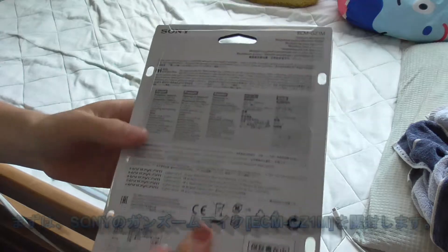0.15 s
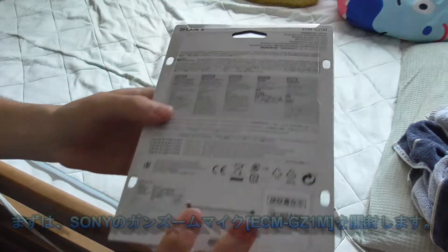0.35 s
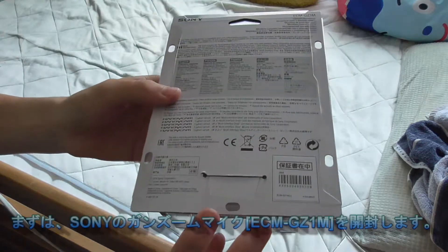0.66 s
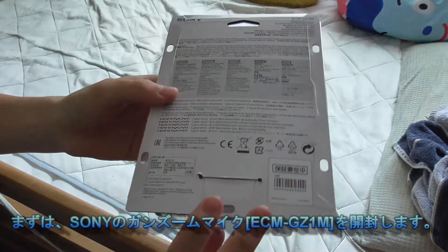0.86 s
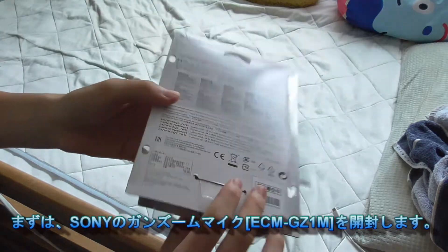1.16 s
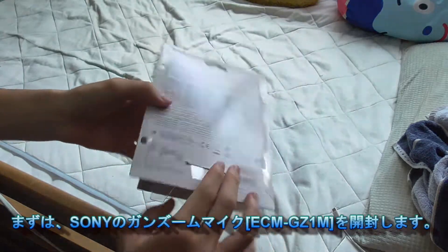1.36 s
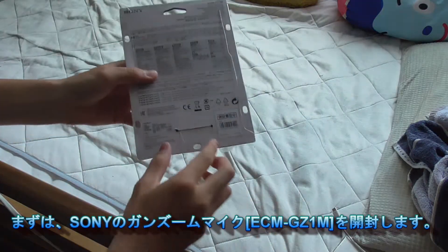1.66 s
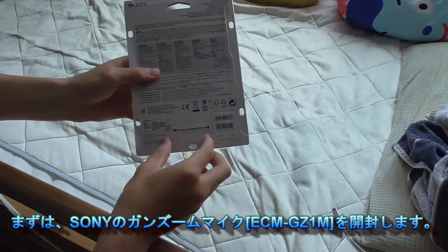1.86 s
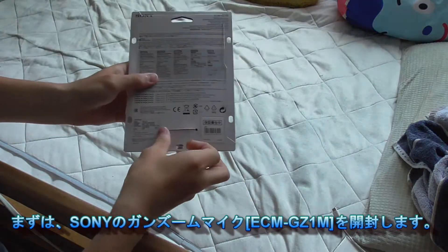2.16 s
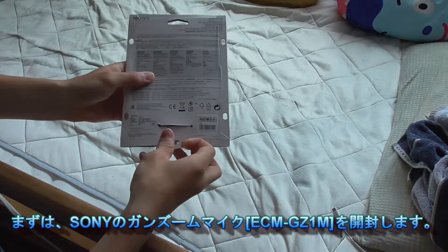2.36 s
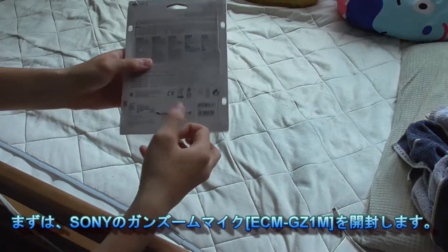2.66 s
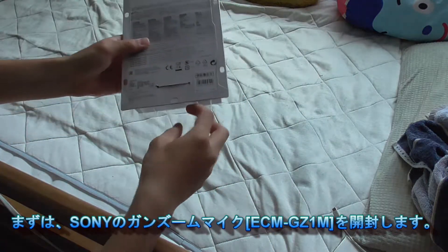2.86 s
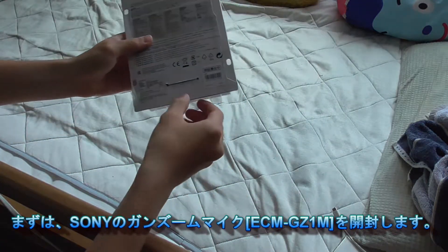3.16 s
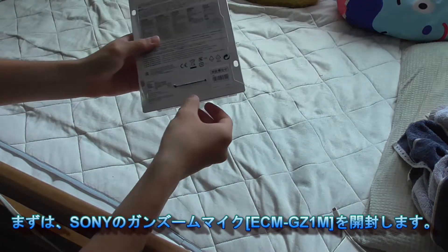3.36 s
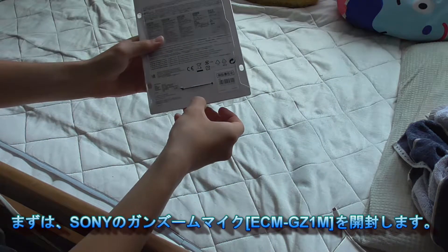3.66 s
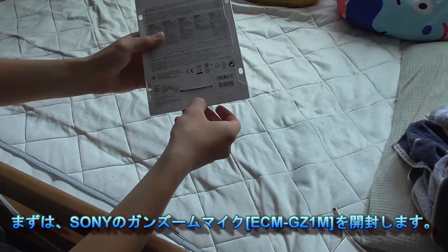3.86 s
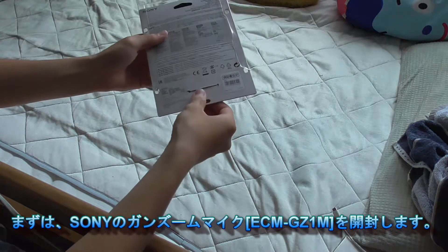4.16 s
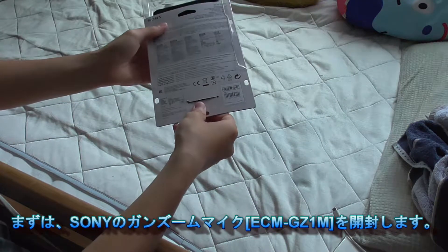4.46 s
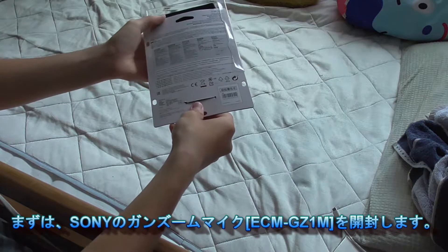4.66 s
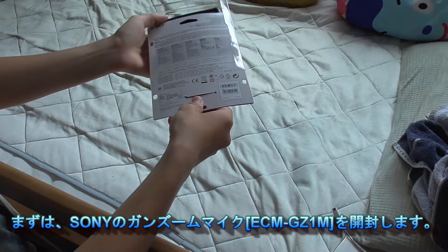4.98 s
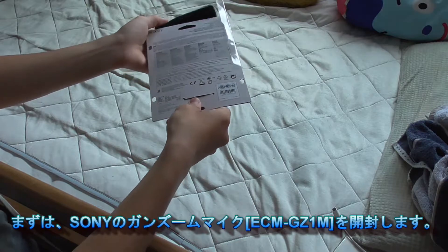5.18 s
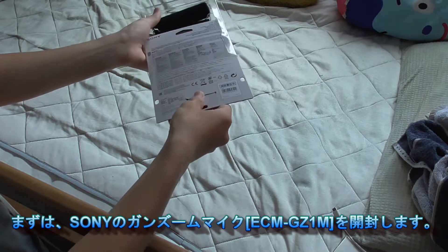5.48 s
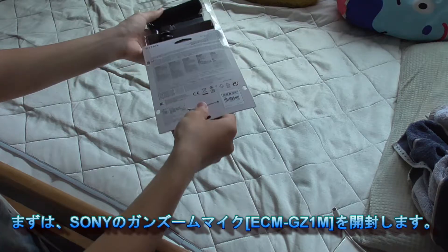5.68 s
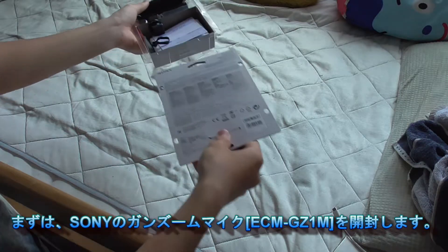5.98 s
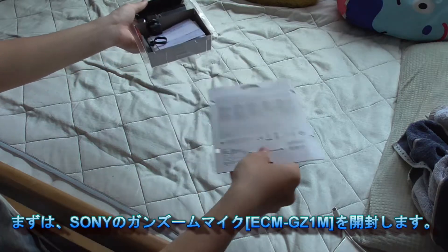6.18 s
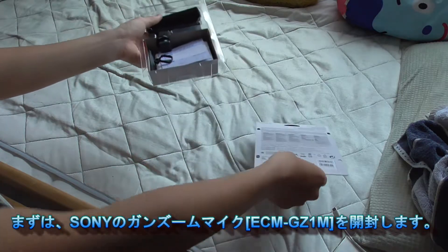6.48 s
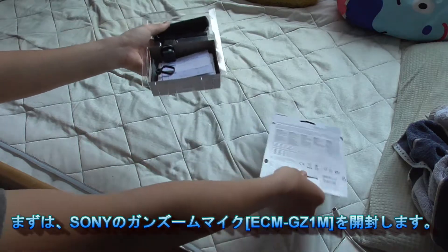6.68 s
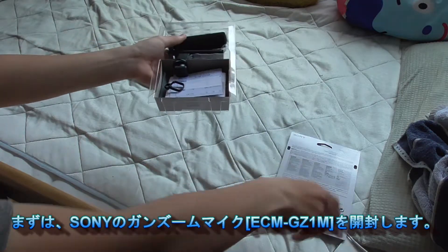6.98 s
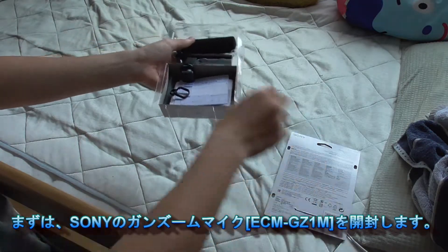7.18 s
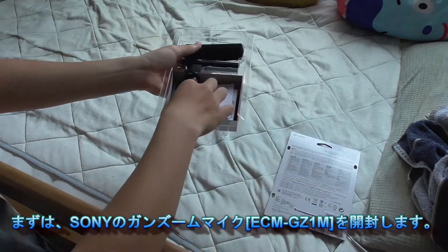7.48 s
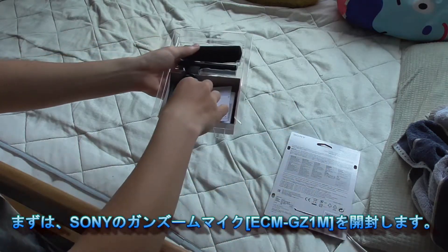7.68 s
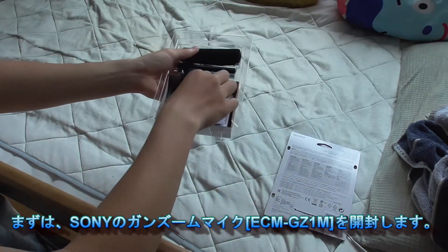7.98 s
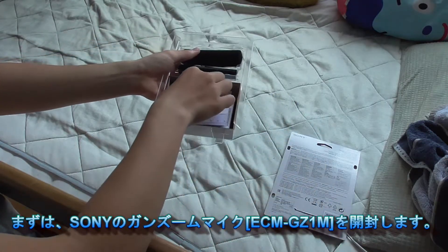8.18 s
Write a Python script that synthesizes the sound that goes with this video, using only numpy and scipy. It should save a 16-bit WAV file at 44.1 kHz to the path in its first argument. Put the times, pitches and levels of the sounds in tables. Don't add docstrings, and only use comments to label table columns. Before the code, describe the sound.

Close indoor handling of a plastic blister pack: sharp clicks and cracks, hollow little thumps, then a paper card scraped out in short strokes over faint fan rumble.

```python
import sys
import numpy as np
from scipy import signal
from scipy.fft import rfft, irfft, next_fast_len
from scipy.io import wavfile
from scipy.ndimage import uniform_filter1d

SR = 44100
rng = np.random.default_rng(int(sys.argv[2]) if len(sys.argv) > 2 else 0)


def put_to_file(sound):
    columns = np.atleast_2d(sound).T
    safe = np.clip(columns, -1, 1)
    whole_steps = np.round(safe * 32767)
    wavfile.write(sys.argv[1], SR, whole_steps.astype(np.int16))


def to_linear_factor(level_db):
    exponent = np.asarray(level_db, float) / 20
    return 10 ** exponent


N = 367353

# freq_hz, level_db
RUMBLE = [(15, -63.5), (25, -49.5), (139, -9.5), (173, -6.5), (224, -2.5), (313, -0.5), (345, -2.5),
          (397, -14), (421, -7), (523, -3.5), (650, -10.5), (823, -10.5), (1300, -18.5), (1740, -28),
          (2390, -27.5), (2800, -52.5), (3640, -61.5), (6160, -120)]
# freq_hz, level_db
HISS = [(1650, -31.5), (2800, -7), (2990, -13), (3260, -7.5), (3540, -9), (4340, -11), (4600, -9.5),
        (6070, -17), (7330, -12), (9200, -5), (9740, 1), (10300, -6.5), (12300, -7.5), (12750, -3.5),
        (13200, -8), (15800, -14.5), (15950, -71)]
# freq_hz, likeness (1 = same)
ALIKE = [(60, -1.3), (130, 0.82), (290, 0.85), (640, 0.56), (1410, 0.3), (3100, 0.24), (6820, 0.17),
         (15000, -0.031)]
# pitch_hz, width_hz, level_db
FAN_TONES = [
    (229.7, 4.4, -62.5),
    (341.2, 1.3, -67),
]

# freq_hz, level_db
SCRAPE = [(250, -26), (420, 3), (520, -10.5), (587, 6), (738, -4), (859, 2), (927, -2.5), (1220, -1),
          (1580, -8.5), (2730, -19.5), (3300, -9.5), (3900, -4.5), (4250, -4.5), (4800, -6.5),
          (5770, -12.5), (7470, -10.5), (11800, -16), (15750, -28), (15950, -80.5)]
# start_s, end_s, start_level_db, end_level_db, sizzle_db (re scrape)
FINGERS = [(0, 0.4, -60.5, -70, 3.5), (1.14, 1.53, -78, -66, 2.5), (1.551, 3.798, -62.5, -76.5, -0.5),
           (3.963, 4.325, -61, -90, -3), (4.802, 5.03, -69, -73, 0.5), (5.034, 5.315, -78, -59.5, 0.5),
           (5.443, 5.645, -68, -66.5, 2.5), (6.988, 7.36, -69.5, -87, 3), (7.53, 8.117, -68, -77.5, -8.5)]
# start_s, length_s, peak_db, card_body_db, sizzle_db (re scrape)
SHOVES = [(0, 0.11, -63.5, -8, 2), (0.154, 0.016, -61.5, 1, 7.5), (1.785, 0.047, -61, -26, -8),
          (2.024, 0.082, -58, 2, 0), (2.764, 0.0315, -47, -8, -7), (2.893, 0.042, -55.5, 0, -7),
          (4.93, 0.046, -62, 2, -22), (5.094, 0.12, -63.5, 3, -12), (5.522, 0.044, -60.5, -1, 1.5),
          (7.015, 0.031, -58, 7.5, 4)]
# start_s, length_s, peak_db, card_body_db, sizzle_db (re scrape)
RUBS = [(0.199, 0.022, -62, -8, 8.5), (0.246, 0.067, -65.5, -10, 5), (0.382, 0.022, -50, -15, -2),
        (1.402, 0.052, -53, -12, -22), (1.504, 0.12, -59, 0, 8), (1.626, 0.024, -51, -9, -6),
        (1.94, 0.044, -63.5, 11, -17), (2.232, 0.077, -57.5, 1, 1.5), (3.149, 0.027, -56.5, 4, -2.5),
        (4.212, 0.073, -69.5, -2, 0), (7.068, 0.024, -47, -3, -9), (6.0825, 0.013, -40, -27, 1),
        (6.394, 0.1, -72, -3, 2.5), (6.926, 0.016, -60, 12, -1), (6.935, 0.049, -49.5, 10.5, 1.5),
        (7.27, 0.038, -52.5, 9, -2.5), (7.534, 0.084, -59.5, 8.5, -4), (7.653, 0.098, -63.5, 13, -3),
        (7.6, 0.065, -67, 10, -12), (2.95, 0.13, -65.5, 9.5, -20), (3.105, 0.015, -68, -8, -20),
        (7.84, 0.036, -69.5, 8, -3), (3.36, 0.06, -67, -7, -20), (2.715, 0.06, -60, -8, -5)]
# (time_s, scrape_db)
PULLS = [
    (-45, -8.5, [(3.788, -84), (3.798, -62), (3.826, -60.5), (3.84, -48), (3.875, -48.5), (3.915, -53), (3.94, -71)]),
    (-45.5, -6, [(3.972, -83), (3.984, -51.5), (4.04, -43), (4.115, -44.5), (4.13, -58.5), (4.18, -87)]),
    (-47, -5, [(4.31, -73), (4.33, -49.5), (4.37, -46), (4.49, -57), (4.56, -66)]),
    (-54.5, 2, [(4.54, -69.5), (4.68, -62), (4.79, -62.5), (4.82, -76)]),
    (-49.5, -2, [(5.26, -81), (5.31, -47), (5.37, -44), (5.43, -48), (5.485, -73)]),
    (-51, -3, [(5.63, -73), (5.645, -52), (5.69, -43), (5.73, -50.5), (5.82, -52.5), (5.94, -59.5)]),
    (-49, -6, [(5.93, -55), (5.97, -44.5), (5.987, -31.5), (6.005, -54), (6.045, -71)]),
]
# start_s, length_s, level_db
FIZZ = [(3.819, 0.087, -50.5), (3.99, 0.047, -55), (5.313, 0.15, -73), (5.64, 0.61, -66)]

# ratio (to main mode), level_db
TRAY_MODES = [(.62, -23), (0.801, -16.5), (1.0, 6.5), (1.28, -1), (1.6, -5.5), (2.1, -7)]
# start_s, peak_db, pitch_hz, t60_s, bass_db (re peak)
THUMPS = [(0.147, -45, 530, 0.037, -4), (0.162, -37, 620, 0.016, -3), (0.286, -44, 714, 0.023, -10),
          (1.5013, -29.5, 760, 0.0098, -3), (1.5018, -23.5, 261, 0.043, -34),
          (1.5091, -38, 1000, 0.011, -30), (2.08, -25.5, 630, 0.014, -26), (2.233, -33, 638, 0.04, -28),
          (2.329, -42, 553, 0.02, -14), (2.444, -31, 560, 0.011, -31), (2.527, -40, 533, 0.027, -17),
          (2.6125, -40, 640, 0.03, -28), (2.6185, -23, 610, 0.045, -40), (2.781, -44, 700, 0.039, -8),
          (2.811, -37, 556, 0.025, -6), (2.885, -36, 540, 0.072, -28), (3.296, -38, 467, 0.023, -23.5),
          (3.326, -40.5, 454, 0.023, -32), (3.409, -34, 570, 0.014, -30), (3.519, -34, 575, 0.025, -28),
          (5.3, -33.5, 636, 0.031, -5), (5.972, -28.5, 730, 0.025, -32), (7.0635, -34, 1070, 0.019, -35),
          (7.064, -35, 295, 0.036, -25)]
# start_s, peak_db, pitch_hz, blow_ms, bass_db (re peak)
BUMPS = [(0.39, -36, 632, 3.5, -3), (1.155, -30, 675, 5.2, -3.5), (1.624, -35.5, 565, 15, -25),
         (1.691, -37, 630, 4.7, -21), (1.714, -35, 565, 4.2, -14), (2.004, -41.5, 420, 17, -1.5),
         (2.198, -35, 404, 5.6, -6), (2.423, -27, 570, 4.5, -44), (4.34, -42, 1553, 130, -34),
         (5.33, -41, 746, 140, -35), (5.99, -37, 705, 8, -8), (6.937, -32.5, 620, 11, -1.5),
         (6.954, -38.5, 540, 15, -15), (7.005, -55, 1020, 26, -21), (7.273, -38, 1053, 6.3, -3),
         (7.276, -35, 590, 11.3, -6)]

# start_s, peak_db, ring_hz, sizzle_db (re peak)
SNAPS = [(0.287, -45, 4760, -7), (0.342, -45, 5490, -9), (1.153, -46, 4900, 2), (1.163, -45.5, 5120, 10.5),
         (1.201, -39, 4780, -27), (1.416, -40, 5840, -6), (1.4233, -36.5, 5730, -6),
         (1.9086, -56, 4500, -20), (2.006, -46.5, 5600, -10), (2.0418, -46, 6020, 2),
         (2.3305, -30, 3700, -8), (2.447, -35, 4310, -15.5), (2.528, -51, 4020, -20.5),
         (2.803, -45, 3450, 0), (2.8792, -32, 4300, -11), (3.2944, -33, 4700, -12),
         (3.3286, -45, 4200, -21), (4.263, -44, 4570, -14), (6.089, -35, 3550, -13),
         (6.9363, -42.5, 3160, 11), (7.7507, -52, 4370, -12), (7.994, -50, 3780, -14)]
# start_s, peak_db, ring_hz, sizzle_db (re peak), card_db (re peak)
CRACKS = [
    (1.5017, -26, 4170, -10, -12),
    (2.0826, -20, 4100, -6, -9),
    (2.6171, -15, 3480, -3, -16),
    (3.5197, -34, 4200, -3.5, -16),
    (7.0643, -27, 4060, -3.5, -14.5),
]
# start_s, peak_db, ring_hz, sizzle_db (re peak), length_ms
SCUFFS = [(1.151, -43.5, 4970, -3, 9.3), (1.618, -38.5, 4970, -12, 4.7), (2.0773, -25, 4000, -10, 3.8),
          (2.1923, -42, 4700, -6, 11), (2.234, -33.5, 4350, -24, 3.2), (2.4211, -27.5, 3940, -13, 8.4),
          (2.612, -39, 4500, -26, 9.8), (2.7795, -33, 3300, -12, 3.2), (2.857, -47, 4240, -11, 11),
          (3.265, -53, 4170, -9, 9.8), (3.4065, -33.5, 4200, -5, 7.8), (3.978, -54, 4400, -6, 4.4),
          (4.326, -37, 4150, -21, 4.6), (7.272, -42, 3550, 4, 3.3)]

# pitch_hz, width_hz, level_db
RIM = [(3746, 340, -8), (4800, 700, 1.5), (7150, 280, -8.5), (7700, 700, -4), (8900, 500, -4),
       (9720, 900, -2), (10700, 330, -11), (11600, 300, -19.5), (13270, 900, -17.5), (14650, 580, -9.5),
       (15420, 1000, -15)]
FLAP = [(2900, 180, -26), (4050, 800, 3), (5130, 160, -4), (6900, 520, -3.5), (8260, 690, -11),
        (9300, 400, -10), (10500, 400, -3.5), (11700, 860, -5), (12800, 210, -12), (14930, 520, -27)]
CORNER = [(2390, 380, -3), (3220, 460, 0), (4150, 440, 1), (5130, 690, -5.5), (6470, 540, -6),
          (8300, 460, -7), (9440, 380, -8), (10520, 590, -12.5), (12370, 250, -22), (13200, 400, -22)]
BACK = [(610, 120, -3), (1000, 170, -1.5), (1140, 310, 0), (1378, 91, -3), (2090, 240, -10),
        (3160, 330, -11.5), (4050, 550, -7.5), (4970, 330, -9), (6400, 790, -15), (9230, 470, -16),
        (13200, 440, -37)]
SHEET = [(1120, 420, -0.5), (3450, 240, -4), (3920, 380, 0.5), (6310, 360, -5), (7570, 880, -3.5),
         (8610, 350, -5), (8900, 270, -14), (11600, 380, -17)]
RAIL = [(713, 150, 2.5), (997, 185, 2.5), (2040, 250, -12), (2920, 200, -17), (4300, 290, -15),
        (4940, 240, -24), (7500, 300, -19)]
LIP = [(3617, 610, -2), (4760, 600, -5.5), (450, 130, -2), (760, 150, -2), (895, 200, -1), (1150, 86, -7.5),
       (1440, 160, -8), (1910, 200, -10.5)]
HOLLOW = [(550, 100, -13), (925, 130, 6), (4000, 220, -6), (5200, 320, -16)]
TAB = [(312, 120, -2), (1250, 170, 1), (2100, 250, -6)]
POUCH = [(568, 130, -1), (1030, 190, -16.5)]
STAPLE = [(3380, 410, -4), (4400, 550, -3), (6460, 860, 1), (7710, 700, -4), (8800, 820, -4.5)]
CREASE = [(1480, 830, -6), (2680, 900, 2), (4300, 1600, -2), (6600, 1600, -1), (8500, 2000, -11)]
# start_s, peak_db
TICKS = [(1.9245, -59), (3.8304, -39), (3.9785, -36), (4.2163, -53), (4.3574, -34), (4.4544, -34),
         (5.563, -43), (7.0358, -39.5), (7.538, -48), (7.5457, -42), (7.6054, -50), (7.66, -50),
         (7.667, -48), (7.6804, -39), (7.693, -44), (7.716, -44), (1.1525, -42), (1.1575, -40),
         (4.379, -38), (4.3875, -38), (4.408, -46), (7.7014, -47), (7.8724, -55), (7.9428, -49),
         (8.0094, -53), (8.0694, -52)]
# (start_s, peak_db)
JOLTS = [(BACK, [(1.5017, -12.5), (1.5092, -36), (2.0795, -36), (2.0825, -31)]), (CORNER, [(2.0817, -17),
         (2.0829, -13), (2.0878, -31), (2.0902, -28)]), (HOLLOW, [(2.4255, -33), (2.4293, -28.5),
         (2.4478, -39)]), (RIM, [(2.617, -10)]), (LIP, [(2.6179, -11)]), (FLAP, [(3.5195, -21),
         (3.5255, -36), (3.5275, -38), (3.5298, -36)]), (RAIL, [(5.9692, -22.5), (5.9725, -30),
         (5.9765, -29), (5.9925, -35), (5.9995, -32)]), (TAB, [(5.985, -26.5), (5.9885, -34)]),
         (POUCH, [(3.4078, -31), (3.4114, -30.5), (2.8052, -31.5), (3.8, -40), (5.31, -34)]),
         (SHEET, [(7.0641, -20), (7.0655, -37)]), (CREASE, TICKS), (STAPLE, [(2.7808, -32), (2.7826, -24),
         (6.0832, -34), (6.0886, -29.5), (6.093, -35)])]

# freq_hz, side_db (re mid)
PORTS = [(60, -13), (110, -6.5), (200, -26.5), (380, -7.5), (700, -28.5), (1290, -11), (2380, -23.5),
         (4400, -22.5), (8120, 0), (15000, -4.5)]
# freq_hz, left_minus_right_db
LEAN = [(150, 1), (400, 0.5), (1300, 3.5), (2400, 0.5), (4400, 1), (8100, 1), (15000, -5.5)]
# freq_hz, t60_s
ROOM = [(250, 0.19), (700, 0.13), (1800, 0.097), (4500, 0.18), (10000, 0.14), (15000, 0.07)]
# freq_hz, level_db
REFLECT = [(200, -4.5), (700, 3), (2000, 2), (4000, -6), (7000, -6.5), (12000, -5)]


def evened(x):
    return x / np.sqrt(np.mean(x ** 2) + 1e-20)


def peaked(x, db):
    return to_linear_factor(db) * x / (abs(x).max() + 1e-12)


def add(mix, start_s, sound):
    part = mix[round(start_s * SR):][:len(sound)]
    part += sound[:len(part)]


def read(points, hz):
    f, value = np.transpose(points)
    return np.interp(np.log(hz + 1), np.log(f + 1), value)


def coloured(x, points, lo_hz=0., hi_hz=SR):
    length = x.shape[-1]
    size = next_fast_len(length + 512)
    hz = np.fft.rfftfreq(size, 1 / SR) + 1
    edges = 1 / np.sqrt((1 + (lo_hz / hz) ** 12) * (1 + (hz / hi_hz) ** 12))
    spectrum = rfft(x, size) * to_linear_factor(read(points, hz)) * edges
    return irfft(spectrum, size)[..., :length]


def band(x, lo_hz, hi_hz, order):
    sos = signal.butter(order, [lo_hz, hi_hz], "band", fs=SR, output="sos")
    return signal.sosfilt(sos, x)


def ring(x, hz, t60):
    r = to_linear_factor(-60 / (max(t60, .001) * SR))
    w = 2 * np.pi * hz / SR
    return signal.lfilter([np.sin(w)], [1, -2 * r * np.cos(w), r * r], x)


def air(points, db, patchy_db, swell_db):
    frames = N // 256 + 5
    hz = np.fft.rfftfreq(1024, 1 / SR)
    a, b, c, d, patches = rng.standard_normal((frames, 513, 5)).T
    patches = uniform_filter1d(patches, size=6, axis=0)
    patches = evened(uniform_filter1d(patches, size=14, axis=1))
    swell = evened(uniform_filter1d(rng.standard_normal(frames), size=40))
    alike = np.clip(read(ALIKE, hz), -1, 1)[:, None]
    left = a + 1j * b
    right = alike * left + np.sqrt(1 - alike ** 2) * (c + 1j * d)
    z = np.array([left, right])
    z *= to_linear_factor(read(points, hz)[:, None] + patchy_db * patches + swell_db * swell)
    x = signal.istft(z, nperseg=1024, noverlap=768)[1][:, :N]
    return to_linear_factor(db) * x / np.std(x.mean(0))


def hum():
    return sum(to_linear_factor(db) * evened(ring(rng.standard_normal(N), hz, 2.1 / width))
               for hz, width, db in FAN_TONES)


def grit_layers(per_s, spread_db, flutter_db):
    sizes = to_linear_factor(spread_db * np.minimum(rng.exponential(1, N), 3))
    grit = sizes * (rng.random(N) < per_s / SR) * rng.standard_normal(N)
    flutter = evened(uniform_filter1d(rng.standard_normal(N), size=400))
    grit *= to_linear_factor(flutter_db * flutter)
    z = signal.stft(grit, nperseg=256)[2]
    patches = rng.standard_normal(z.shape)
    patches = uniform_filter1d(patches, size=4, axis=0)
    patches = evened(uniform_filter1d(patches, size=24, axis=1))
    patchy_db = 1.9
    grit = signal.istft(z * to_linear_factor(patchy_db * patches), nperseg=256)[1][:N]
    bands_hz = [(2130, 6670), (305, 2800), (6300, SR), (9800, 15000)]
    return [evened(coloured(grit, SCRAPE, lo, hi)) for lo, hi in bands_hz]


def fingers(under_db, body_db):
    scrape, body, sizzle, _ = grit_layers(per_s=6700, spread_db=1.5, flutter_db=0.5)
    t, out = np.arange(N) / SR, np.zeros(N)
    for start, end, start_db, end_db, sizzle_db in FINGERS:
        fade = np.clip(np.minimum(t - start + .01, end + .01 - t) / .02, 0, 1)
        touch = fade * to_linear_factor(np.interp(t, [start, end], [start_db, end_db]))
        out += touch * (scrape + to_linear_factor(body_db) * body + to_linear_factor(sizzle_db) * sizzle)
    return to_linear_factor(under_db) * out


def strokes(grip_s, release_s):
    slacken_db, build_db = -12.5, -7.5
    body_follow, body_lead_s, firm_db = 0.5, 0.0094, -43
    power = np.zeros((4, N))
    for s, length, db in FIZZ:
        t = np.arange(0, length, 1 / SR)
        add(power[3], s, to_linear_factor(db) ** 2 * np.sin(np.pi * t / length))
    for rows, ends_db in [(RUBS, [0, slacken_db]), (SHOVES, [build_db, 0])]:
        for s, length, peak_db, body_db, sizzle_db in rows:
            t = np.arange(0, length + release_s, 1 / SR)
            grip = np.clip(t / grip_s, 0, 1)
            release = np.clip((length + release_s - t) / release_s, 0, 1)
            level_db = peak_db + np.interp(t, [0, length], ends_db)
            pressure = to_linear_factor(level_db) ** 2 * grip * release
            for layer, db in zip(power, [0, body_db, sizzle_db]):
                add(layer, s, pressure * to_linear_factor(db) ** 2)
    for body_db, sizzle_db, rows in PULLS:
        s, db = np.transpose(rows)
        scrape_db = np.interp(np.arange(s[0], s[-1], 1 / SR), s, db)
        card_db = body_db + body_follow * (scrape_db - firm_db)
        add(power[0], s[0], to_linear_factor(scrape_db) ** 2)
        add(power[1], s[0] - body_lead_s, to_linear_factor(card_db) ** 2)
        add(power[2], s[0], to_linear_factor(scrape_db + sizzle_db) ** 2)
    layers = grit_layers(per_s=12000, spread_db=1.8, flutter_db=0.75)
    return (np.sqrt(power) * layers).sum(0)


def thumps(rows, rise):
    out, t = np.zeros(N), np.arange(7000) / SR
    rough = rng.standard_normal((len(rows), len(t)))
    detune = rng.uniform(0.858, 1.059, (len(rows), len(TRAY_MODES)))
    for (s, db, hz, t60, ms, bass_db), noise, off in zip(rows, rough, detune):
        u = t * 1000 / max(ms, .1)
        blow = noise * u ** rise * np.exp(-u ** (1 + rise))
        hollow = np.zeros(len(t))
        for (ratio, level_db), k in zip(TRAY_MODES, off):
            mode_hz = hz * ratio * (k if ratio != 1 else 1)
            hollow += to_linear_factor(level_db) * evened(ring(blow, mode_hz, t60))
        bass = ring(blow, 266, 0.078) + 0.34 * ring(blow, 119, 0.048) + 1.4 * ring(blow, 338, 0.037)
        add(out, s, peaked(hollow, db) + peaked(bass, db + bass_db))
    return out


def tray():
    thump_ms = 3.54
    bump_t60_s = 0.036
    sharp = [(s, db, hz, t60, thump_ms, bass_db) for s, db, hz, t60, bass_db in THUMPS]
    soft = [(s, db, hz, bump_t60_s, ms, bass_db) for s, db, hz, ms, bass_db in BUMPS]
    return thumps(sharp, rise=0.059) + thumps(soft, rise=0.25)


def crackles(rows, rise, t60, ring_share):
    out, t = np.zeros(N), np.arange(3000) / SR
    shape = (len(rows), len(t))
    sizes = to_linear_factor(0.32 * np.minimum(rng.exponential(1, shape), 3))
    slips = rng.standard_normal(shape) * sizes
    for (s, db, hz, sizzle_db, card_db, ms), slip in zip(rows, slips):
        u = (t + 1 / SR) * 1000 / max(ms, .2)
        drive = slip * u ** rise * (np.exp(-u ** 2.0) + 0.0305 * np.exp(-u / 4.8))
        patch = np.diff(ring(drive, hz, t60), prepend=0)
        sheet = evened(band(drive, lo_hz=2713, hi_hz=6370, order=2)) + ring_share * evened(patch)
        card = band(drive, lo_hz=1220, hi_hz=2550, order=2)
        sizzle = band(drive, lo_hz=5400, hi_hz=11500, order=2)
        add(out, s, peaked(sheet, db) + peaked(sizzle, db + sizzle_db) + peaked(card, db + card_db))
    return out


def film():
    card_db, snap_ms, crack_ms = -12.5, 1.65, 1.3
    snaps = [(*row, card_db, snap_ms) for row in SNAPS]
    snaps += [(*row, crack_ms) for row in CRACKS]
    scuffs = [(s, db, hz, sizzle_db, card_db, ms) for s, db, hz, sizzle_db, ms in SCUFFS]
    snapping = crackles(snaps, rise=0.47, t60=0.004, ring_share=0.98)
    return snapping + crackles(scuffs, rise=0.38, t60=0.0064, ring_share=0.68)


def releases():
    swell = 1.6
    out, jolt = np.zeros(N), signal.unit_impulse(1500)
    for part, rows in JOLTS:
        notes = np.zeros(len(jolt))
        for hz, width, db in part:
            t60 = swell / width
            notes += to_linear_factor(db) * width ** 2 * ring(ring(jolt, hz, t60), hz, t60)
        for s, peak_db in rows:
            add(out, s, peaked(notes, peak_db))
    return out


def ports(x):
    shifted = signal.hilbert(x, next_fast_len(N))[:N].imag
    wander = 0.45 + 0.78 * evened(uniform_filter1d(rng.standard_normal(N), size=1500))
    side = coloured(shifted * wander, PORTS, lo_hz=5500) + coloured(shifted, PORTS, hi_hz=5470)
    half = [(hz, db / 2) for hz, db in LEAN]
    opposite = [(hz, -db) for hz, db in half]
    return np.array([coloured(x + side, half), coloured(x - side, opposite)])


def room(x):
    taps = np.zeros((2, SR // 2))
    slots = np.arange(190, SR // 2 - 20, 20)
    at = slots + rng.integers(0, 20, (2, len(slots)))
    np.put_along_axis(taps, at, rng.choice([-1., 1.], at.shape), 1)
    taps[1] = 0.87 * taps[0] + 0.86 * taps[1]
    hz, t, z = signal.stft(taps, SR, nperseg=128)
    decay = to_linear_factor(-60 * t / read(ROOM, hz)[:, None])
    tail = signal.istft(z * decay, SR, nperseg=128)[1]
    spectrum = rfft(tail)
    power = abs(spectrum) ** 2
    flatten = np.sqrt(uniform_filter1d(power, size=900) / uniform_filter1d(power, size=60))
    tail = irfft(spectrum * flatten)
    return signal.fftconvolve(x[None], tail / np.linalg.norm(tail[0]), axes=1)[:, :N]


def scene():
    pack = film() + releases() + tray()
    pack = pack + strokes(grip_s=0.0062, release_s=0.0061) + fingers(under_db=-4.5, body_db=3.5)
    pack = band(pack, lo_hz=152.0, hi_hz=13400, order=4)
    steady = air(RUMBLE, -53.5, patchy_db=0.86, swell_db=0.2)
    steady = steady + air(HISS, -71, patchy_db=1.0, swell_db=0.5) + hum()
    steady = steady * to_linear_factor([[.3], [-.3]])
    room_db = -8.5 + np.array([[1.1], [-1.1]])
    return ports(pack) + to_linear_factor(room_db) * room(coloured(pack, REFLECT)) + steady


def top_cut(x):
    return signal.sosfilt(signal.butter(12, 16530, fs=SR, output="sos"), x)


def record(dry):
    held = np.tanh(dry)
    edge = signal.firwin(401, 16480, window=("kaiser", 8), fs=SR)
    mix = signal.oaconvolve(held, edge[None], "same", axes=1)
    return top_cut(mix)


dry = scene()
out = record(dry)
put_to_file(out)
```